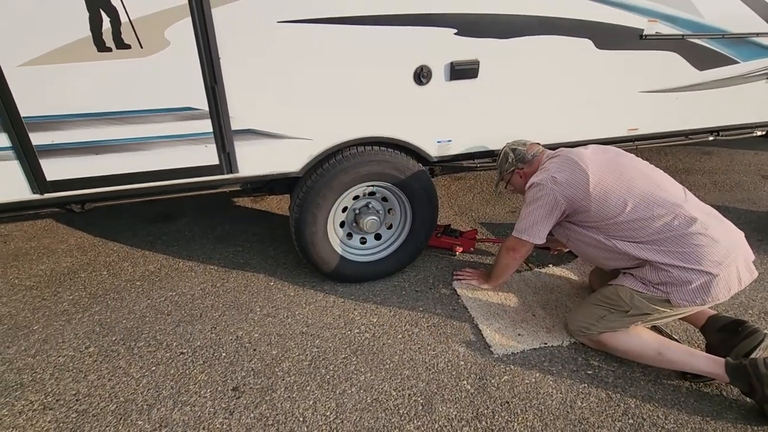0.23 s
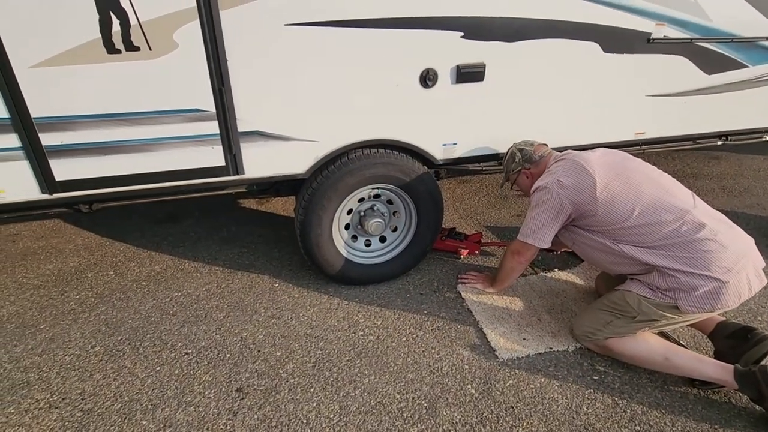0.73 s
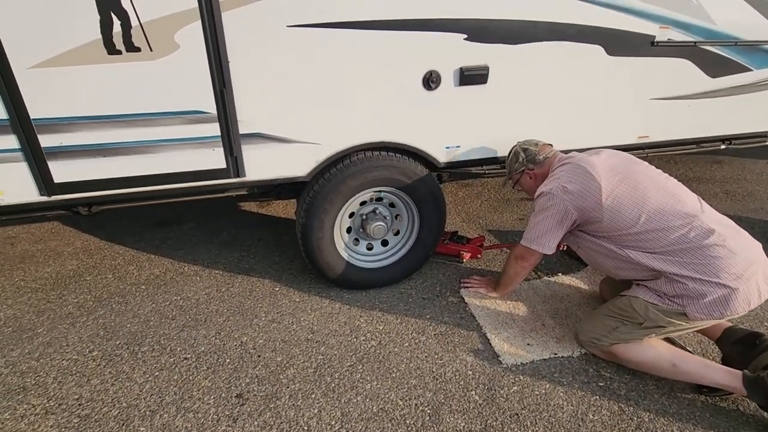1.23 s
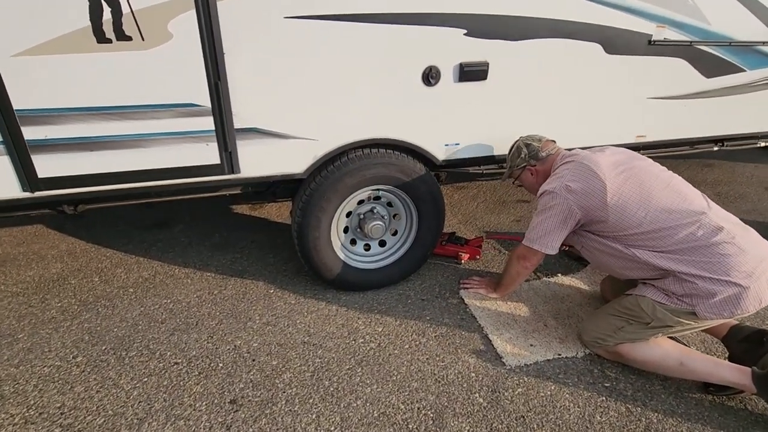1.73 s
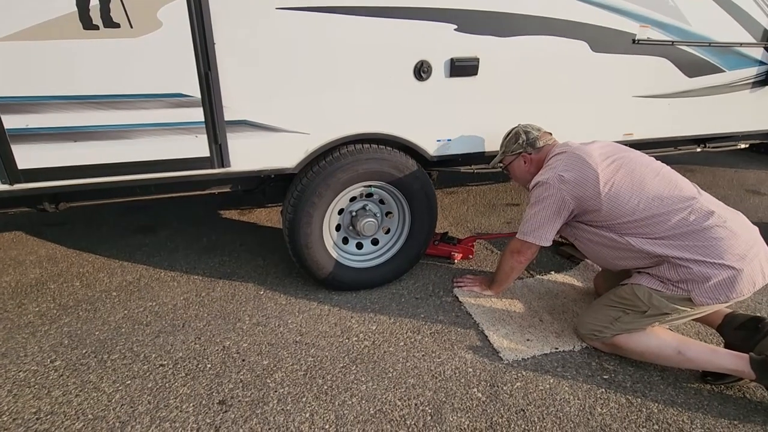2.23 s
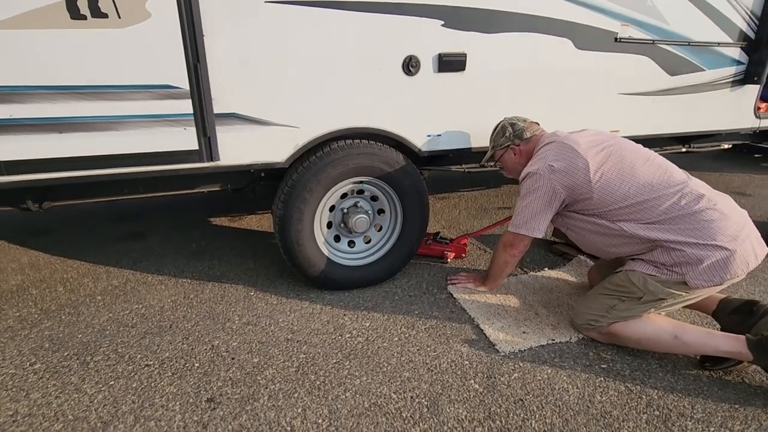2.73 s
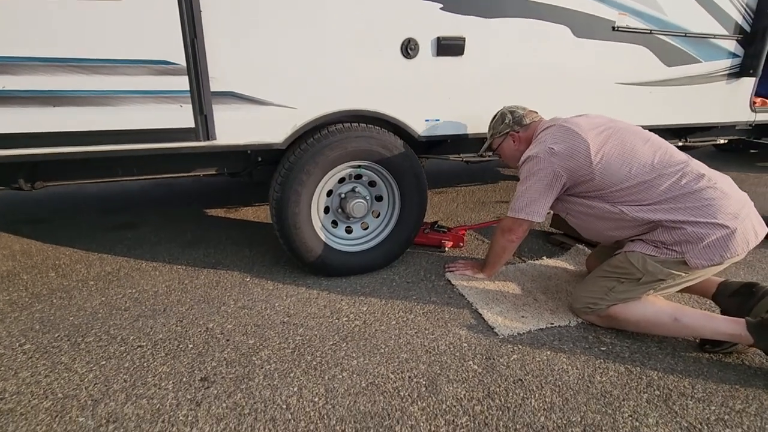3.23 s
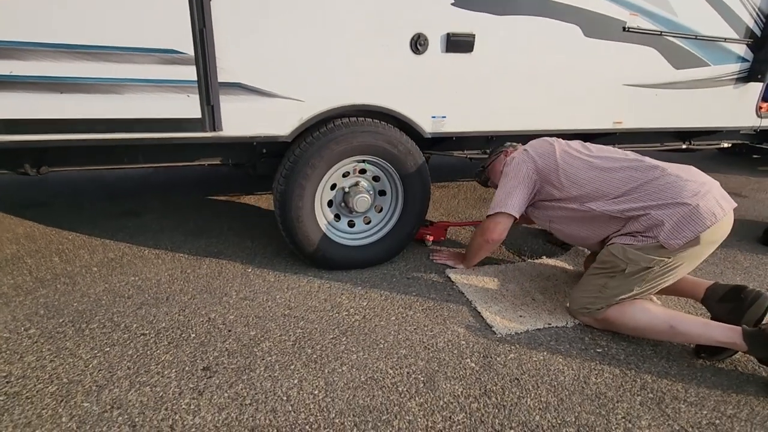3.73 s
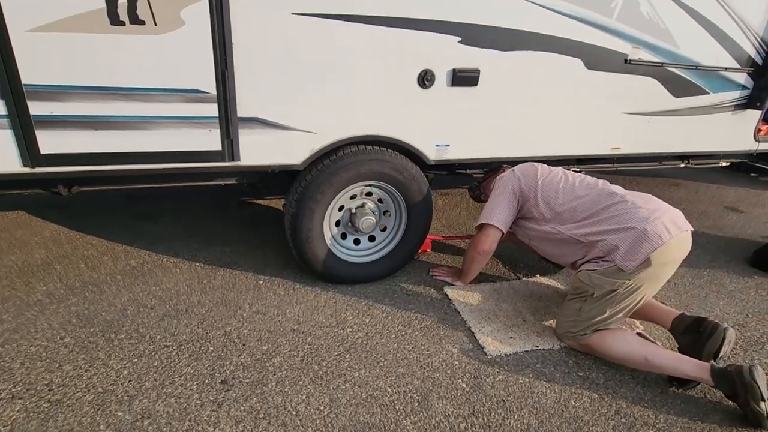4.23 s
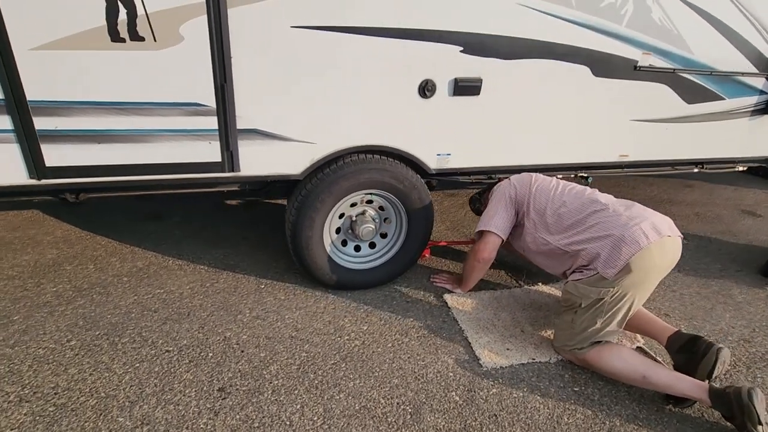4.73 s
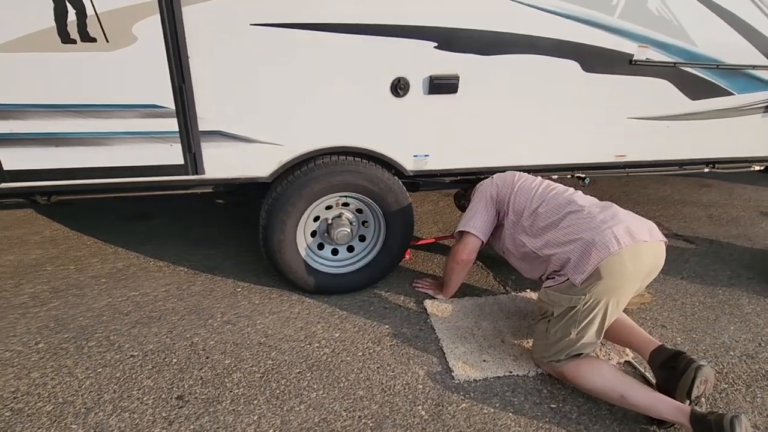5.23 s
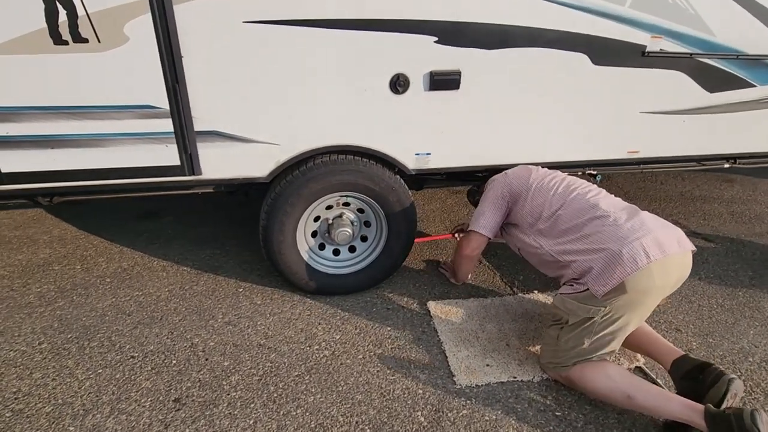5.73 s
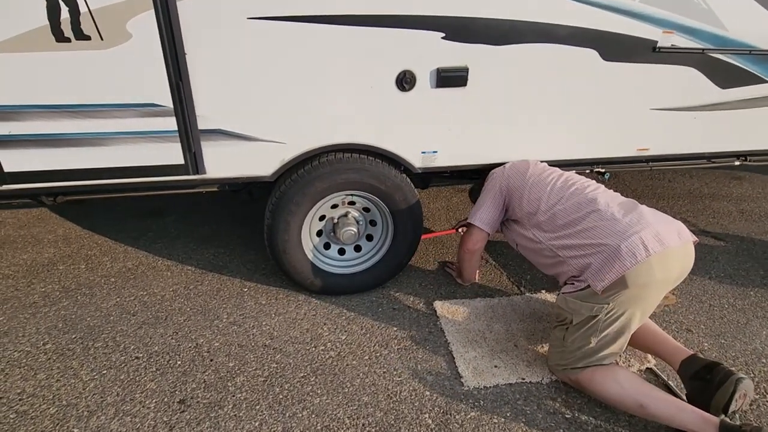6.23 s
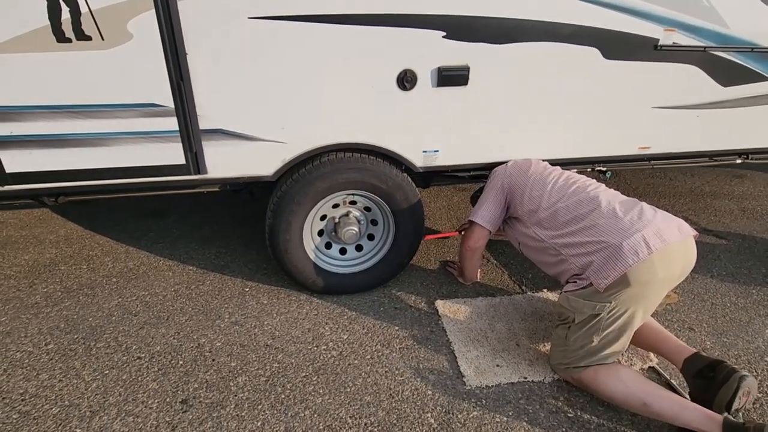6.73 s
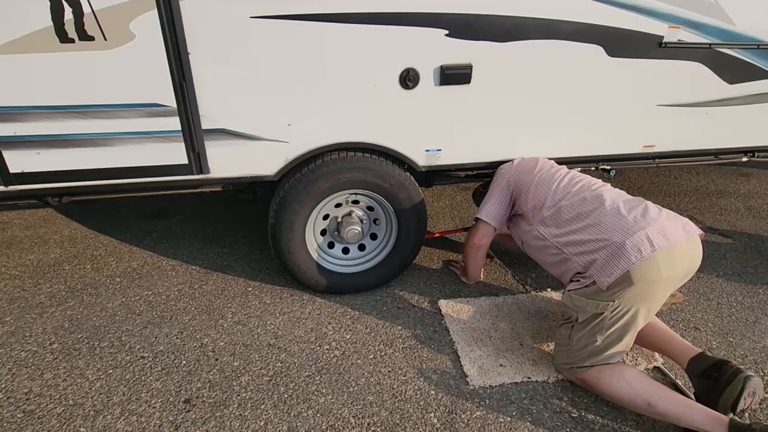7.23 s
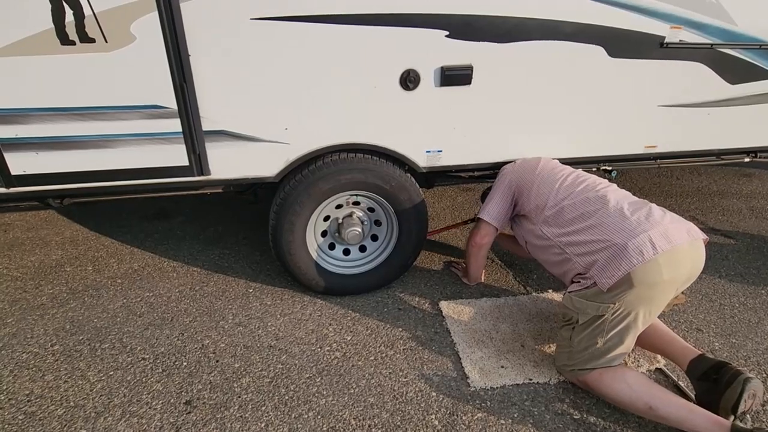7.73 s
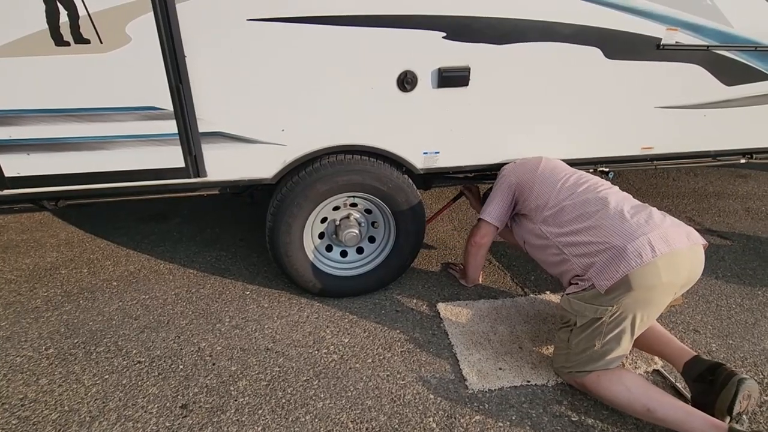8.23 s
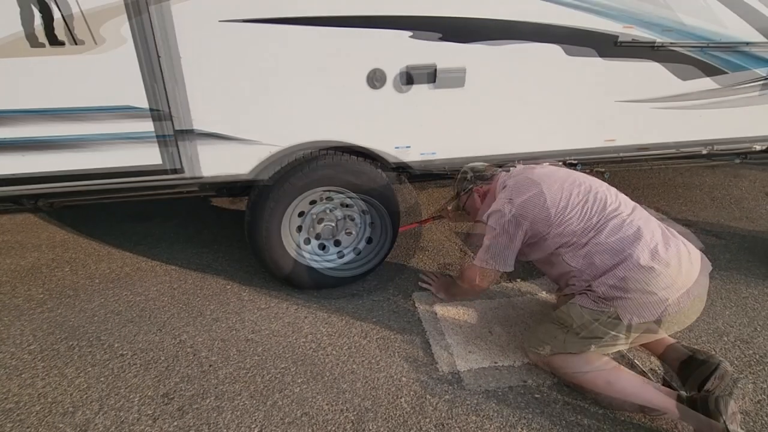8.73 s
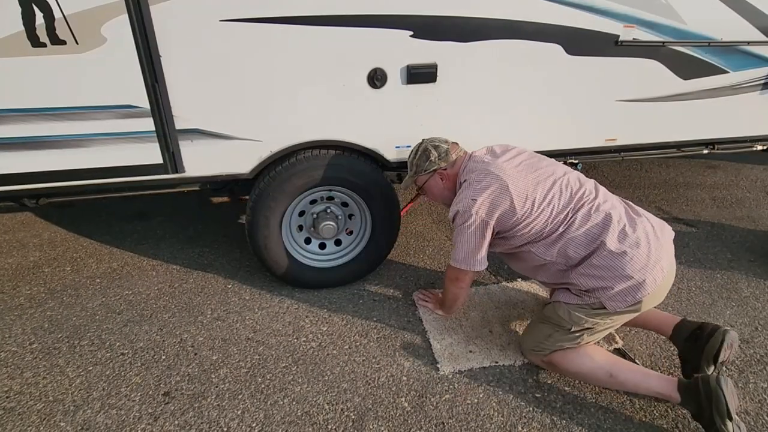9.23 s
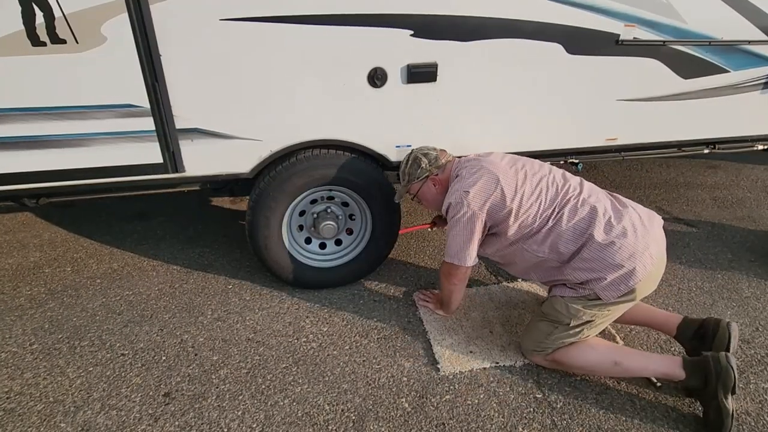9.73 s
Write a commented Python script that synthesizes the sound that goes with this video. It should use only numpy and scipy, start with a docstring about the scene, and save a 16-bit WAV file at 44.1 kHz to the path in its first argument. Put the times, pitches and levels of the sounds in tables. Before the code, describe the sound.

From 0 s a vehicle is already passing, with low exhaust drone, mid tyre roar, hissing tread and slaps over road seams until 1.3 s; it fades away by about 3.5 s. Beneath it all a truck idles low and steady, with very faint high insects. A distant small bird chirps thinly between 0.4 and 3 s, and grit ticks and crunches, busiest from 2 to 3.2 s. At 3.5 to 3.9 s, then 3.9 to 4.4 s, a steel jack is shoved over rough asphalt, grinding, jolting, rattling and squeaking. Near 5.05 s the handle clanks loudly into its socket, with smaller knocks to 5.4 s. Brief rubbing creaks come at 5.4, 5.9 and 6.2 s. Linkage knocks fall at 6.5, strongest at 7.0, and faintly at 7.75 s. Sparse tiny ticks follow in the quiet. From 9 s another car's tyre roar builds quickly and widens, with faint whine at 9.5 s.

```python
"""Moving a floor jack beside a road

A vehicle drives past and fades while a truck idles beside a trailer: shaped noise, with sines for engine notes.
A steel floor jack is shoved twice over rough asphalt: noise grains and jolts ring its chassis.
Its handle clanks, rubs and knocks as it is pumped: fading sines with noise cracks, and ringing tiny slips.
Grit ticks, a bird chirps, insects shrill, and at the end the tyres of another car approach as noise."""
import sys
import numpy as np
from scipy import signal
from scipy.fft import rfft, irfft, next_fast_len
from scipy.io import wavfile
from scipy.ndimage import uniform_filter1d, map_coordinates

SR = 44100
rng = np.random.default_rng(int(sys.argv[2]) if len(sys.argv) > 2 else 0)


def generate_wav(sig):
    """Save sig (samples, or channels by samples) to the path in sys.argv[1] as 16-bit PCM at SR."""
    pcm = np.round(np.clip(np.atleast_2d(sig).T, -1, 1) * 32767).astype(np.int16)
    wavfile.write(sys.argv[1], SR, pcm)


N = 440559


def amp(db):
    """Turn decibels into a gain."""
    return 10 ** (np.asarray(db) / 20)


def unit(x):
    """Scale a sound to rms 1."""
    return x / np.sqrt(np.mean(x ** 2) + 1e-20)


def along(points, hz):
    """Read a curve of (Hz, value) points on a log frequency axis."""
    f, v = np.transpose(points)
    return np.interp(np.log(hz + 1), np.log(f + 1), v)


def curves(rows):
    """Give one value per sample for each column after the time."""
    s, *cols = np.transpose(rows)
    return [np.interp(np.arange(N) / SR, s, c) for c in cols]


def wobble(rate):
    """Draw a smooth random curve with rate random points a second."""
    steps = np.arange(0, N + 64, 64)
    points = rng.standard_normal(int(N * rate / SR) + 4)
    coarse = map_coordinates(points, [steps * rate / SR])
    return np.interp(np.arange(N), steps, coarse)


def step(s, takes):
    """Rise smoothly from 0 to 1 around s seconds."""
    return .5 + .5 * np.tanh((np.arange(N) / SR - s) / takes)


def filtered(x, response):
    """Multiply the spectrum of x by a response that depends on frequency."""
    n = x.shape[-1]
    m = next_fast_len(n + 8192)
    return irfft(rfft(x, m) * response(np.fft.rfftfreq(m, 1 / SR)), m)[..., :n]


def rush(spectrum):
    """Make stereo noise of rms 1 whose two sides are most alike in the bass."""
    # how alike left and right are: pitch_hz, likeness (0 to 1)
    likeness = [(60, 0.91), (250, 0.99), (600, 0.64), (1500, 0.26), (4000, 0.0058), (12000, 0.032)]

    def middle_and_side(hz):
        turn = np.arccos(np.clip(along(likeness, hz), -1, 1)) / 2
        return amp(along(spectrum, hz)) * np.array([np.cos(turn), np.sin(turn)])

    mid, side = filtered(rng.standard_normal((2, N)), middle_and_side)
    return unit(np.array([mid + side, mid - side]))


def drifting(x, depth_db):
    """Let narrow bands of a noise swell and sink at random."""
    z = signal.stft(x, nperseg=2048)[2]
    field = rng.standard_normal(z.shape[1:])
    field = uniform_filter1d(field, size=3, axis=0)  # smooth across pitch
    field = uniform_filter1d(field, size=10, axis=1)  # smooth over time
    return unit(signal.istft(z * amp(depth_db * unit(field)), nperseg=2048)[1][:, :N])


def body(modes, f):
    """Ring like steel: a sum of steep-sided (Hz, width Hz, dB) resonances that never sound early."""
    return sum(amp(db) * (1j * f * w / (c * c - f * f + 1j * f * w)) ** 2 for c, w, db in modes)


def add(track, s, sound):
    """Mix a sound into a track at s seconds."""
    part = track[..., round(s * SR):][..., :sound.shape[-1]]
    part += sound[..., :part.shape[-1]]


def placed(x, wet_db):
    """Add a short sound's scattered echo from under the trailer, in stereo."""
    # echo between ground and trailer: pitch_hz, time to fade by 60 dB (s)
    echo_fade = [(300, 0.3), (2000, 0.071), (6000, 0.087), (14000, 0.19)]
    hz, t, z = signal.stft(rng.standard_normal((2, SR // 4)), SR, nperseg=256)
    fading = z * amp(-60 * t / along(echo_fade, hz)[:, None])
    tail = signal.istft(fading, SR, nperseg=256)[1]
    wet = signal.fftconvolve(x[None], tail, axes=1)[:, :len(x)]
    return x + amp(wet_db) * unit(wet) * np.std(x)


def aside(x, lag):
    """Let a source off to one side reach the left port lag seconds later than the right."""
    return filtered(x, lambda hz: np.exp(np.pi * 1j * hz * lag * np.array([[-1], [1]])))


def facing(x):
    """Give the jack's sound a different tone and arrival time at each of the two microphone ports."""
    # how the ports differ: pitch_hz, left minus right (dB)
    ports = [(200, -9), (1000, 3), (2000, 6.5), (4000, -4), (8000, 1.5), (12000, -2)]
    toned = filtered(x, lambda hz: amp(along(ports, hz) * np.array([[.5], [-.5]])))
    return aside(toned, lag=.00005)


def passing_vehicle():
    """Exhaust, tyres and rushing air, made of shaped noise and gliding notes, fade as the vehicle leaves."""
    # its fading parts, before trims and random wobble: time_s, exhaust_db, tyre_roar_db, tread_hiss_db
    levels = [(0, -34, -30.5, -44), (.5, -36.5, -36.5, -42.5), (.9, -32, -38, -48.5),
              (1.3, -32, -35.5, -45.5), (1.62, -33.5, -38.5, -44.5), (2.35, -40, -49, -49.5),
              (2.95, -45, -51, -53), (3.45, -57, -65, -68.5)]
    # colour of the exhaust noise: pitch_hz, relative level (dB per Hz)
    exhaust_colour = [(41, -43), (70, -12), (81, -5.5), (155, 1), (188, -3.5), (227, 2.5), (320, 1),
                      (404, -4.5), (520, -7), (680, -40), (1140, -120)]
    # colour of the tyre roar: pitch_hz, relative level (dB per Hz)
    roar_colour = [(250, -25), (420, -16.5), (517, -6), (624, 4.5), (905, 5), (1100, 1.5), (1240, -16),
                   (1570, -8.5), (1800, -41), (2340, -54), (3960, -120)]
    # colour of the tread hiss: pitch_hz, relative level (dB per Hz)
    hiss_colour = [(760, -26), (1300, 5.5), (1570, -1.5), (1800, 2.5), (2380, -3.5), (4040, -9.5),
                   (4490, -11), (7000, -21.5), (9100, -50.5), (15400, -120)]
    # colour of the rushing air: pitch_hz, relative level (dB per Hz)
    air_colour = [(3240, -30), (5500, -10), (7760, -11.5), (8400, -7), (9850, -9.5), (12200, -5),
                  (13800, -15), (15800, -17.5)]
    # the tread hiss sharpens briefly: peak_s, half_length_s, pitch_hz, width_hz, level_db
    hiss_swells = [(0.152, .25, 3260, 1100, -52), (1.623, 0.15, 2360, 600, -45.5)]
    # tyres slapping over road seams: start_s, level_db
    seams = [(.575, -30), (.739, -29), (.845, -39), (1.03, -34.5), (1.163, -29), (1.186, -28), (1.309, -25)]
    # exhaust notes that swell and fade: start_s, length_s, start_hz, end_hz, level_db (before wobble)
    drone_notes = [(0, 1.41, 245, 238, -35.5), (0.124, .82, 320, 318.9, -32), (1.049, 0.86, 254, 274, -34),
                   (1.546, 0.86, 166, 166.8, -33), (2.29, 0.83, 166, 165.5, -47.5)]
    slap_colour = [(90, -39), (200, 7), (400, -22), (650, 1), (900, -2), (1200, -41), (2500, -52), (6000, -80)]
    seam_decay_s = 0.038
    air_db = -15.5  # against the tread hiss

    t = np.arange(N) / SR
    exhaust_db, roar_db, hiss_db = curves(levels)
    out = amp(exhaust_db - 0.5 + 1.0 * wobble(20)) * rush(exhaust_colour)
    out += amp(roar_db + 3.0 + 0.9 * wobble(21.86)) * drifting(rush(roar_colour), depth_db=4)
    out += amp(hiss_db + 0.41 * wobble(14)) * drifting(rush(hiss_colour), depth_db=3)
    out += amp(hiss_db + air_db) * rush(air_colour)

    for s, half, hz, width, db in hiss_swells:
        noise = rng.standard_normal((2, N))
        sharp = unit(filtered(noise, lambda f: body([(hz, width, 0)], f)))
        out += amp(db) * np.exp(-((t - s) / half) ** 2) * sharp

    slaps = sum(amp(db) * (t > s) * np.exp(-np.abs(t - s) / seam_decay_s) for s, db in seams)
    out += slaps * rush(slap_colour)

    for s, length, start_hz, end_hz, db in drone_notes:
        u = np.clip((t - s) / length, 0, 1)  # progress through the note
        hz = (start_hz + (end_hz - start_hz) * u) * (1 + 0.0138 * wobble(25.43))
        phase = 2 * np.pi * np.cumsum(hz) / SR
        out += amp(db + 1.1 * wobble(11)) * np.sin(np.pi * u) * np.sin(phase)

    last_s = levels[-1][0]
    gone = np.exp(-np.maximum(0, t - last_s) / 0.15)
    return aside(out * gone, lag=-0.0003) * amp([[.6], [-.6]])


def idling_truck():
    """Firing pulses of a slightly uneven idle, made of sines, over fan murmur and street noise."""
    # idling engine: multiple of the firing rate, level_db (rms, before wobble)
    orders = [(.5, -73), (1, -45), (1.247, -59.5), (1.5, -56), (3.302, -67.5), (5.5, -72)]
    # colour of the fan murmur: pitch_hz, relative level (dB per Hz)
    murmur_colour = [(20, -31.5), (42, 5), (75, -3.5), (105, -13.5), (150, -20), (250, -14.5), (320, -3),
                     (400, -11), (480, -19), (700, -22.5), (1000, -62.5)]
    # colour of the street noise: pitch_hz, relative level (dB per Hz)
    street_colour = [(290, -43), (500, -14.5), (595, -3), (749, -14), (958, -8), (1370, -13), (1860, -14.5),
                     (2630, -19.5), (4180, -23), (4500, -24.5), (7040, -36), (11200, -48), (15800, -51)]
    firing_hz = 58.1
    phase = 2 * np.pi * firing_hz * np.arange(N) / SR + 0.034 * wobble(9.5)
    engine = 0
    for k, db in orders:
        engine = engine + amp(db + 2.1 * wobble(30)) * np.sin(k * phase + rng.uniform(0, 2 * np.pi))
    # a sine of peak sqrt(2) has rms 1
    return np.sqrt(2) * engine + amp(-52.5) * rush(murmur_colour) + amp(-66) * rush(street_colour)


def insects():
    """A faint, wavering shrill from the verge: noise in a narrow high band."""
    shrill = rush([(3900, -40.0), (4450, 1.0), (4560, 2.0), (4700, -8.5), (5200, -37)])
    return amp(-83.5 + 1.4 * wobble(11)) * shrill


def bird():
    """Thin, warbling, mostly falling chirps of a small bird far away: gliding sines."""
    # chirps: start_s, length_s, start_hz, end_hz (before warble), level_db (before echo)
    chirps = [(.427, 0.051, 4490, 4540, -56), (1.048, 0.11, 4620, 4300, -54),
              (1.487, 0.046, 4860, 4080, -48.5), (1.644, .053, 4500, 4230, -49),
              (1.705, 0.144, 4550, 4640, -55), (2.432, 0.025, 4630, 4440, -54),
              (2.48, 0.04, 4530, 4380, -56), (2.967, 0.041, 4400, 4180, -59)]
    out = np.zeros((2, N))
    for s, length, start_hz, end_hz, db in chirps:
        u = np.minimum(np.arange(SR // 4) / SR / length, 1)  # progress through the chirp
        hz = (start_hz + (end_hz - start_hz) * u) * (1 + .017 * wobble(130)[:len(u)])
        tone = np.sin(2 * np.pi * np.cumsum(hz) / SR)
        add(out, s, placed(amp(db) * np.sin(np.pi * u) * tone, wet_db=-4.5))
    return out


def grit():
    """Small stones crunch and skip on the asphalt: short noise bursts, each with a brief ping of its own."""
    # grit ticks: time_s, level_db (before a common cut), centre_hz, spread (octaves)
    ticks = [(.5756, -30, 3200, 1.4), (.7761, -40.5, 3640, 1), (1.8284, -39, 2600, 1.2),
             (2.0904, -43, 11000, 0.49), (2.1415, -36, 2600, 1.5), (2.1644, -32.5, 6000, 2.4),
             (2.3221, -34, 4000, 2.4), (2.34, -39, 3500, 2), (2.701, -32.5, 2000, 0.93),
             (2.796, -35, 2400, 1.2), (2.807, -34, 2980, 1.8), (3.0754, -41.5, 3000, 0.96),
             (3.1285, -46, 5000, 2.3), (3.2004, -32.5, 3040, 1), (3.4146, -50, 2360, 1.16),
             (4.8429, -53, 2600, 1.1), (5.593, -50, 5500, 0.86), (6.2677, -51.5, 2400, 0.93),
             (7.3946, -61.5, 11200, .8), (7.425, -63, 9200, .3), (7.6495, -41.5, 6800, 0.14),
             (7.8134, -51.5, 6980, 2), (8.0314, -46.5, 6760, 0.25), (8.1893, -51.5, 11500, 0.61),
             (9.1381, -56, 8500, 0.66), (9.2035, -64, 11500, .6), (9.3774, -61, 7000, 1),
             (9.9398, -56, 3500, 0.18)]
    tone = [(300, -12), (900, 3), (12500, -3.5), (15500, -9)]  # (Hz, dB)
    # fainter grit crackles while the weight shifts
    scuff_from_s, scuff_to_s, scuff_db = 2.35, 3.05, -42.5
    out = np.zeros((2, N))
    t = np.arange(SR // 8) / SR
    crush = t * np.exp(-t / 0.0016)
    scuffs = []
    for when, faint in rng.random(size=(8, 2)):
        scuffs.append((scuff_from_s + (scuff_to_s - scuff_from_s) * when, scuff_db - 4 * faint, 7000, 1.8))

    for s, db, centre_hz, spread in ticks + scuffs:
        pings = [(hz * np.exp(.06 * rng.standard_normal()), 450, 1) for hz in (3400, 5600, 7200, 11000)]

        def colour(f):
            octaves = np.log2((f + 1) / centre_hz)
            hump = amp(-31) + np.exp(-.5 * (octaves / spread) ** 2)
            return hump * amp(along(tone, f)) * (1 + body(pings, f))

        snap = filtered(rng.standard_normal(len(t)) * crush, colour)
        add(out, s - .001, placed(amp(db - 23) * unit(snap), wet_db=3))
    return out * amp([[-.7], [.7]])


def rolling_jack():
    """Steel wheels grind over asphalt as noise grains; stones jolt the chassis and leave it rattling."""
    # shoves of the jack: start_s, rise_s, hold_s, release_s, grinding level_db
    shoves = [(3.456, .14, 0.11, 0.313, -27.5), (3.928, 0.13, 0.23, .14, -39.5)]
    # resonances of the chassis, one list per shove: pitch_hz, width_hz, level_db
    chassis = [
        [(681, 160, -21), (1003, 160, -3.5), (1321, 390, -7), (1946, 75, 1.5), (2000, 400, -7),
         (2390, 210, -23.5), (3240, 260, -17)],
        [(500, 230, -27.5), (1014, 180, 2), (1345, 180, 0.5), (1870, 43, 1), (1970, 130, 4), (2620, 460, -12.5),
         (2790, 450, -25), (3970, 120, -22)],
    ]
    # wheels jolting on stones: time_s, level_db (before a common cut and echo), low thud against the whole (dB)
    jolts = [(3.587, -18.5, 2), (3.606, -19, 0.5), (3.634, -10, -9), (3.673, -13.5, 4.5), (3.689, -13, -5),
             (3.731, -17, 18.5), (3.767, -18, -3), (3.803, -14.5, 0), (3.812, -15, -3), (3.872, -29, -8.5),
             (3.886, -28, -13), (3.951, -30, -5), (4, -20.5, -10), (4.062, -19, 19), (4.071, -10.5, -24),
             (4.093, -12, -1), (4.101, -16, -2), (4.145, -10, -7), (4.153, -15, -21), (4.214, -13, -7),
             (4.232, -14.5, 0), (4.269, -18.5, -6), (4.291, -23.5, 1), (4.319, -21, .5), (4.343, -30.5, -2),
             (4.369, -32.5, -1)]
    crunch = [(200, -22.0), (600, 19.5), (5000, 7), (7000, -1.5), (12000, -6.5), (15500, -17.5)]  # (Hz, dB)
    shove_depth_db = 29.5  # the grinding starts this far under its top and sinks as far in each release time
    rattle_db, rattle_s = -13.5, 0.011  # loose parts rattle on after each jolt
    out = np.zeros((2, N))
    t = np.arange(SR // 5) / SR
    since = np.arange(SR * 3 // 4) / SR

    def ring(f, modes):
        return body(modes, f) + amp(along(crunch, f) - 39.5)

    for (start, rise, hold, release, grind_db), modes in zip(shoves, chassis):
        slack = np.maximum(0, np.maximum(1 - since / rise, (since - rise - hold) / release))
        level = amp(grind_db - shove_depth_db * slack)
        for s, db, thud_db in jolts:
            second_start = shoves[1][0]
            if (s < second_start) != (start < second_start):
                continue  # this jolt belongs to the other shove
            # each jolt strikes the chassis in its own way
            struck = []
            for hz, width, mode_db in modes:
                struck.append((hz * (1 + .015 * rng.standard_normal()), width, mode_db + rng.normal(0, 2.3)))
            thud = [(1300, thud_db), (1800, 0)]
            blow = rng.standard_normal(len(t)) * t * np.exp(-t / 0.00085)
            jolt = filtered(blow, lambda f: ring(f, struck) * amp(along(thud, f)))
            add(out, s - .0015, placed(amp(db - 5.0) * jolt / np.abs(jolt).max(), wet_db=1.0))
            after = start + since - s
            rattle = amp(db + rattle_db) * (after > 0) * np.exp(-np.abs(after) / rattle_s)
            level = np.hypot(level, rattle)
        # about 2000 grains a second; one stream is shared by both sides
        grains = rng.standard_normal((3, len(level))) * (rng.random(len(level)) < 2000 / SR)
        grinding = filtered(grains[0] + 1.7 * grains[1:], lambda f: ring(f, modes))
        add(out, start, level * unit(grinding))
    return out


def friction(rows, rasp_db, steadiness):
    """Dense tiny slips lock into one resonance that swells and fades, with a faint broad rasp."""
    rasp_colour = [(300, -37.0), (1000, 10), (5000, -6), (14000, -25)]  # (Hz, dB)
    out = np.zeros((2, N))
    for s, length, hz, width, db in rows:
        u = np.minimum(np.arange(SR // 6) / SR / length, 1)
        slips = rng.standard_normal(len(u)) * (rng.random(len(u)) < 3000 / SR)
        ring = signal.hilbert(filtered(slips, lambda f: body([(hz, width, 0)], f)))
        # dividing by its own envelope evens out the ring
        ring = unit(ring.real / np.abs(ring) ** np.clip(steadiness, 0, 1))
        rasp = unit(filtered(slips, lambda f: amp(along(rasp_colour, f))))
        swell = np.sqrt(np.abs(np.sin(np.pi * u)))
        add(out, s, placed(amp(db) * (ring + amp(rasp_db) * rasp) * swell, wet_db=-1.5))
    return out


def wheel_squeaks():
    """Dry wheels and axles squeak and judder as they stick and slip."""
    # squeaks: start_s, length_s, pitch_hz, width_hz, level_db (before rasp and echo)
    squeaks = [(3.525, 0.15, 657, 141.3, -35), (3.575, 0.039, 3220, 240, -31), (3.63, .1, 4110, 170, -39.5),
               (3.64, 0.07, 3130, 220, -40.5), (3.8, 0.021, 3320, 200, -36.5),
               (3.795, 0.049, 4170, 170, -44.5), (3.948, 0.014, 1360, 199, -34.5),
               (3.994, 0.011, 2314, 260, -31.5), (3.994, 0.011, 3240, 240, -35.5),
               (4.07, 0.038, 1000, 201, -36.5), (4.21, 0.032, 1120, 220, -36),
               (4.275, 0.044, 548, 149.7, -42)]
    return friction(squeaks, rasp_db=-10.5, steadiness=0.25)


def knocks(rows, modes, crack_db, clang_db):
    """Each knock rings the steel in its own balance; the tight joint damps most of it at once."""
    crack_colour = [(300, -8.5), (1000, 2.5), (3000, 3.5), (6000, 8.5), (12000, -16.5), (15000, -23.0)]  # (Hz, dB)
    out = np.zeros((2, N))
    t = np.arange(SR // 4) / SR
    hz, level, t60 = np.transpose(modes)[:, :, None]
    swell_in = 1 - np.exp(-(t / 0.0058) ** 2)  # each knock swells in over a few ms
    grip = .25 + np.exp(-(t / .008) ** 2)  # the joint damps the ring
    for s, db, thud_db, body_db, chink_db in rows:
        upper_db = clang_db + chink_db / 2
        balance = [(1000, thud_db), (1300, body_db), (1450, body_db), (1750, 0), (2050, 0.0065),
                   (2400, upper_db), (3100, upper_db), (3800, chink_db)]
        strength = level + along(balance, hz) + rng.standard_normal(hz.shape)
        # each knock's pitches are detuned slightly at random
        pitch = hz * (1 + 0.0056 * rng.standard_normal(hz.shape))
        # a random phase drift roughens the ring
        drift = .005 * np.cumsum(rng.standard_normal((len(hz), len(t))), axis=1)
        turns = pitch * t + drift + rng.random(hz.shape)
        ring = np.sum(amp(strength - 60 * t / t60) * np.sin(2 * np.pi * turns), axis=0)
        crack = filtered(rng.standard_normal(len(t)), lambda f: amp(along(crack_colour, f)))
        crack *= amp(crack_db - 60 * t / 0.027) + amp(crack_db - 4.5 - 60 * t / 0.099)
        blow = amp(db) * swell_in * (amp(-3) * grip * ring + crack)
        add(out, s - .002, placed(blow, wet_db=-5))
    return out


def handle_seating():
    """The handle clanks into its socket, ringing socket and tube."""
    # clanks: time_s, level_db (before the ring's balance), then against the 2 kHz ring: thud_db, body_db, chink_db
    clanks = [(5.029, -40.5, -9, 10, -14.5), (5.058, -7, -9, 2, -7), (5.078, -16, -7, 1, -9),
              (5.138, -27, -9, -1, -13.5), (5.238, -19, -19, -7, 7), (5.246, -24, -18, -5, -14),
              (5.259, -28, -11.5, -4, -13.5), (5.284, -41.5, -20, 7, -15), (5.361, -48, 10, 14, 8),
              (5.938, -54, 22, -4, 4)]
    # socket and handle tube: pitch_hz, level_db, time to fade by 60 dB before the grip (s)
    socket = [(488, -10, 0.12), (774, -7, 0.18), (925, -19, 0.059), (1326, 0.5, 0.061), (1417, -8, 0.15),
              (1797, -7.5, 0.1), (1904, 4.5, 0.18), (2057, -11, 0.12), (2463, -4.5, .09), (2822, 0, 0.08),
              (2940, -14, 0.15), (3895, -1.5, 0.06), (4000, -10.5, 0.089), (4340, -16, 0.0803)]
    return knocks(clanks, socket, crack_db=-25.0, clang_db=3.5)


def handle_rubs():
    """The handle rubs in its socket, sticking and slipping."""
    # rubs: start_s, length_s, pitch_hz, width_hz, level_db (before rasp and echo)
    rubs = [(5.42, 0.015, 1260, 109, -50.5), (5.455, 0.0095, 1263, 60, -44), (5.478, 0.029, 1280, 60, -50),
            (5.932, 0.05, 1282, 89, -44.5), (6.17, 0.059, 1220, 216, -53), (6.165, 0.047, 2330, 500, -61),
            (6.198, 0.037, 2180, 323, -44.5)]
    return friction(rubs, rasp_db=-14.5, steadiness=0.59)


def pump_strokes():
    """The pump linkage knocks as it takes the load at the stroke ends."""
    # knocks: time_s, level_db (before the ring's balance), then against the 2 kHz ring: thud_db, body_db, chink_db
    strokes = [(6.506, -37, 14, -7, -14), (6.516, -24, -3.5, -20, -38), (6.987, -18.5, 3, 2, 3),
               (7.014, -31.5, -10, -2, 9.5), (7.728, -47, 5, 12, -10), (7.764, -37.5, -14, 16, 12)]
    # pump linkage: pitch_hz, level_db, time to fade by 60 dB before the grip (s)
    linkage = [(705, -14, 0.13), (857, -8, .06), (982, -6.5, 0.0706), (1384, 4.5, 0.086),
               (1444, -5.5, 0.17), (1660, -6.5, 0.1), (1913, 4, 0.13), (2216, -0.5, 0.081), (2525, 1, 0.15),
               (3060, 3, 0.072), (3750, -15, .09), (3983, -11.5, .11), (4200, -21, 0.096),
               (5140, -20, 0.094)]
    return knocks(strokes, linkage, crack_db=-18.0, clang_db=-6.5)


def approaching_car():
    """Tyre roar, a band of noise, starts narrow near 1 kHz and widens as the car nears; tread whine joins last."""
    car_s, build_s, far_db, near_db = 9.016, .19, -84, -38.5  # comes into earshot, then builds
    low_start_hz, low_fall_hz_per_s = 925, 400  # lower edge of the roar
    high_far_hz, high_near_hz, open_s, open_takes_s = 1060, 1334, 9.33, 0.073  # upper edge
    whine_s, whine_rise_s, whine_db = 9.5, 0.049, -60
    since = np.maximum(0, np.arange(N) / SR - car_s)
    roar_db = near_db + (far_db - near_db) * np.exp(-since / build_s) + 0.68 * wobble(12)
    noise = drifting(rush([(300, -0.5), (3000, -3.5), (5000, -40)]), depth_db=4.5)
    hz, t, z = signal.stft(noise, SR, nperseg=2048)
    hz = hz[:, None] + 1
    low_hz = low_start_hz - low_fall_hz_per_s * np.maximum(0, t - car_s)
    high_hz = np.interp(t, [open_s - open_takes_s, open_s + open_takes_s], [high_far_hz, high_near_hz])
    band = 1 / (1 + np.abs(low_hz / hz) ** 16 + (hz / high_hz) ** 20)
    even_band = band / np.linalg.norm(band, axis=0)  # widening alone does not make it louder
    roar = signal.istft(z * even_band, SR, nperseg=2048)[1][:, :N]
    whine = rush([(1400, -34.0), (1700, 4), (1800, 11.0), (2000, -9), (2600, -58)])
    out = amp(roar_db) * step(car_s, .04) * unit(roar)
    out += amp(whine_db) * step(whine_s, whine_rise_s) * whine
    return aside(out, lag=0.00025) * amp([[2.4], [-2.4]])


def scene():
    """Mix road traffic, wildlife and the idle with the work on the jack."""
    background = passing_vehicle() + idling_truck() + insects() + bird()
    rolling = rolling_jack() + wheel_squeaks()
    pumping = handle_seating() + handle_rubs() + pump_strokes()
    return background + grit() + facing(rolling + pumping) + approaching_car()


def record(dry):
    """Keep nothing above the band limit."""
    top_hz = 15850
    return filtered(dry, lambda hz: hz < top_hz)


dry = scene()
out = record(dry)
generate_wav(out)
```